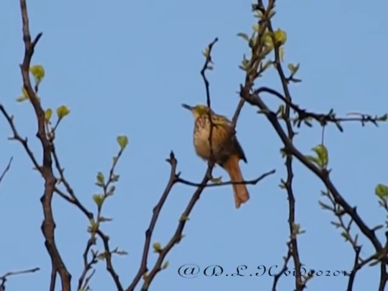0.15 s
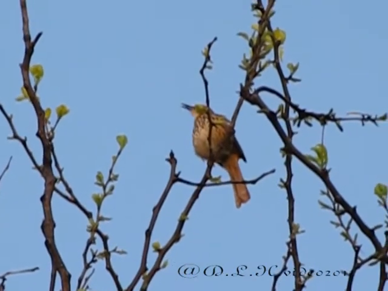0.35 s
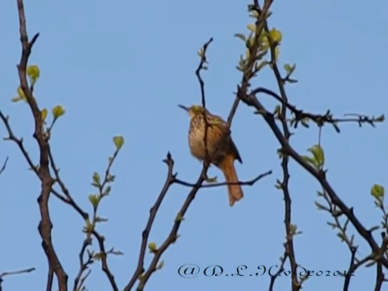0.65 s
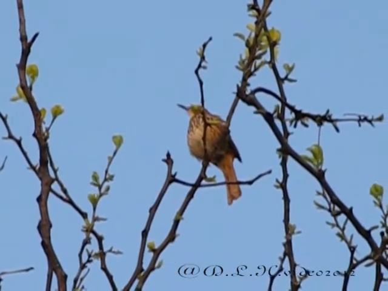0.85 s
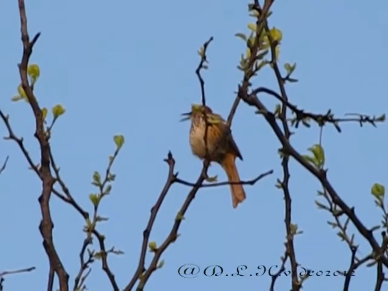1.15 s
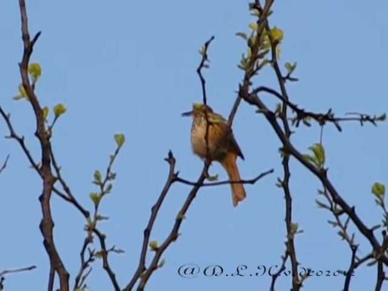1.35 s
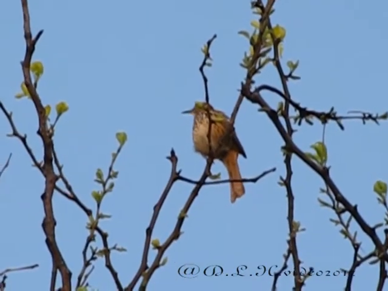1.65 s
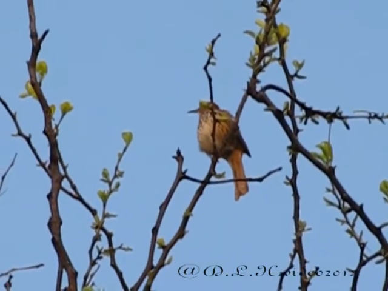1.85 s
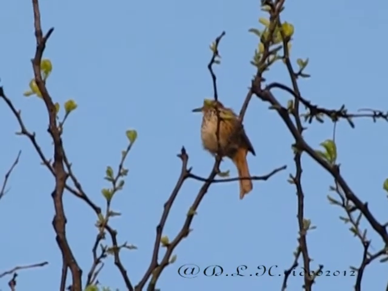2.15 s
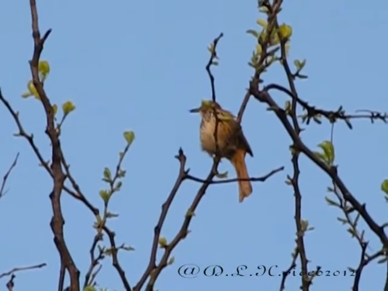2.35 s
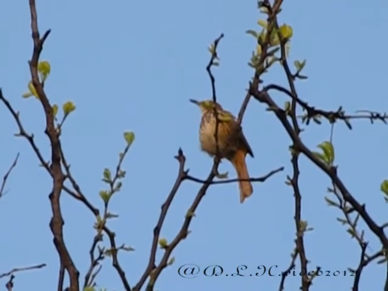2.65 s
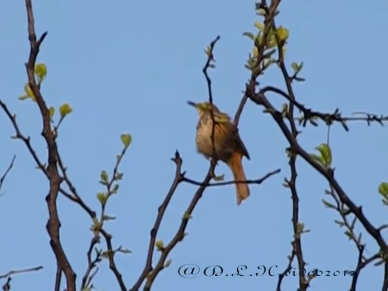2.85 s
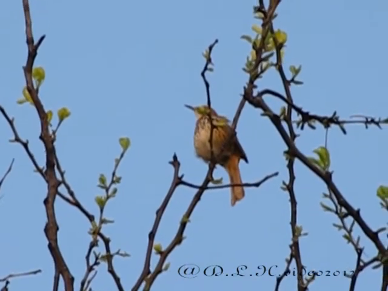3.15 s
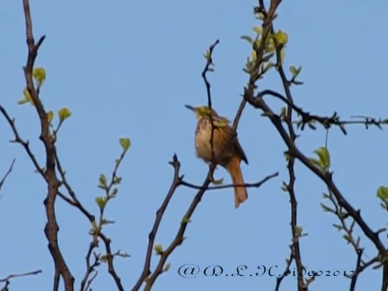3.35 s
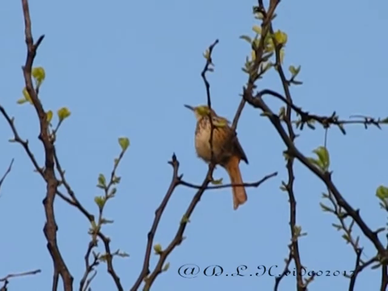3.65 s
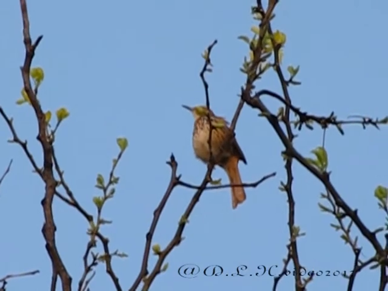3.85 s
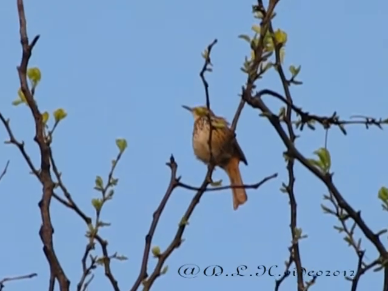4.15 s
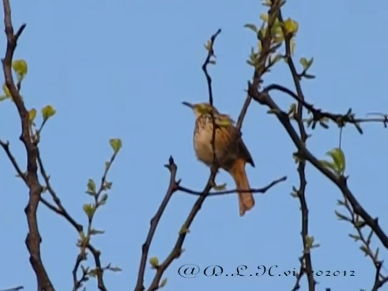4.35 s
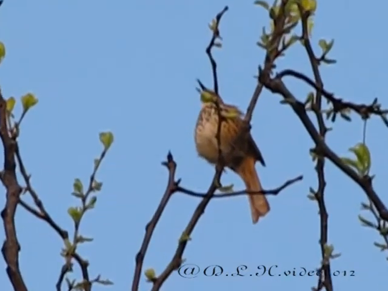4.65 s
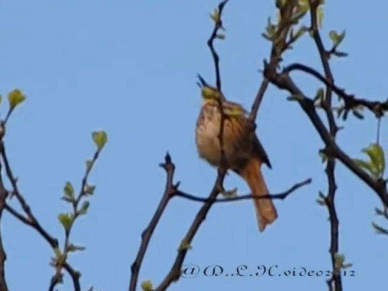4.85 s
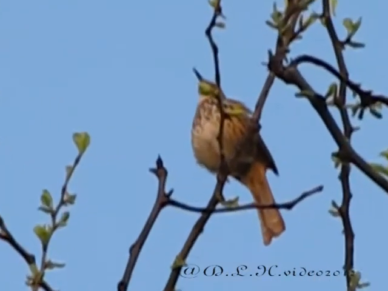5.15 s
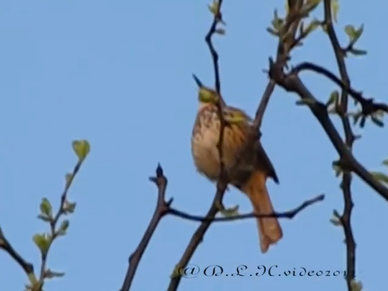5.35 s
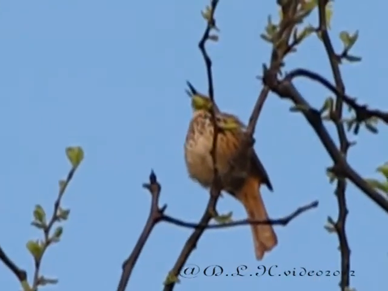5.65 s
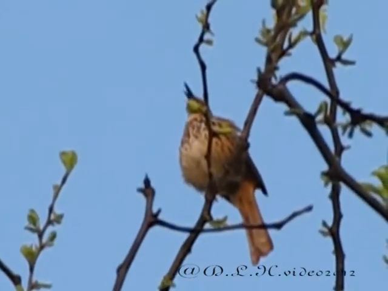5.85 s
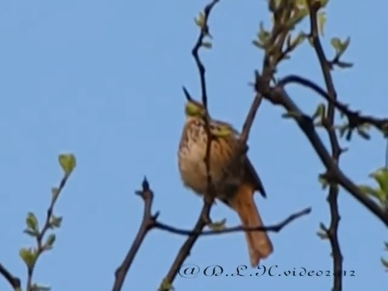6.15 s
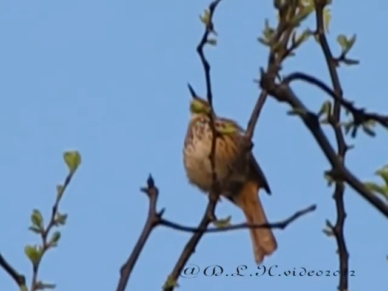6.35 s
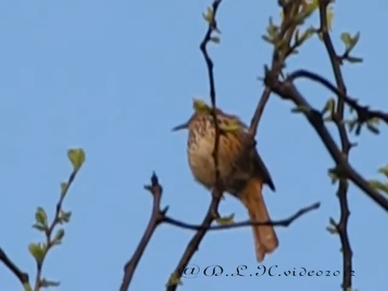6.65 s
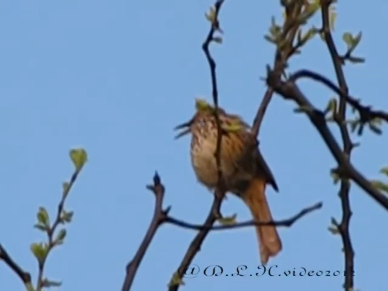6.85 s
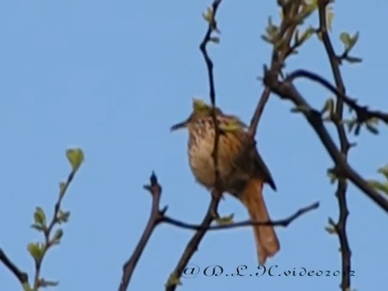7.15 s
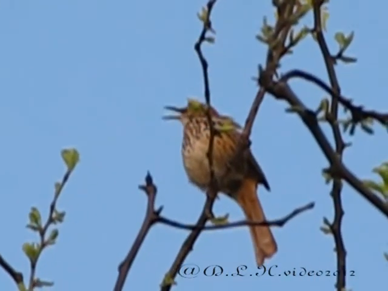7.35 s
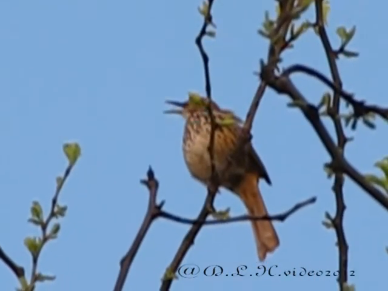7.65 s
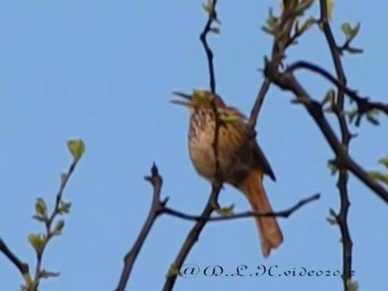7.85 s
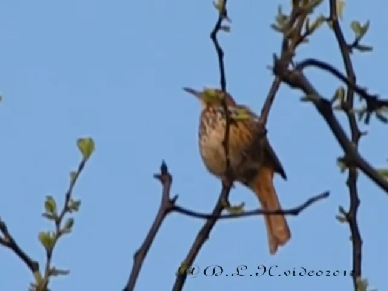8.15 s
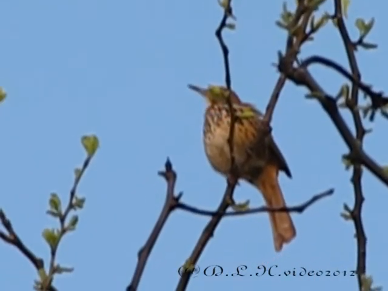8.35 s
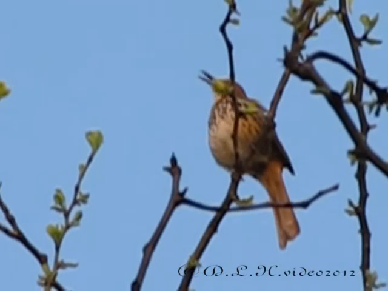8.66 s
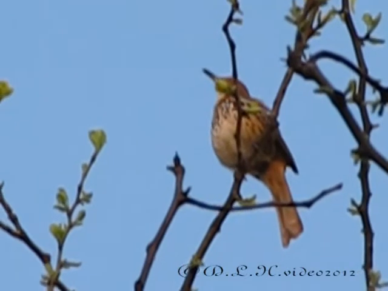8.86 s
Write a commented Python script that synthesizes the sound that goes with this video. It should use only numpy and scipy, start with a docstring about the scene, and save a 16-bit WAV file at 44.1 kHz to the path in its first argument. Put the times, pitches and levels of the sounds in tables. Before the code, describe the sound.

Quick, changing phrases of birdsong ring from a treetop over faraway chirps and soft traffic rumble, with one sharp pop close by.

```python
"""Outdoors among trees, a brown thrasher sings from a treetop: trills, two-voiced slurs, nasal buzzes
and thin whistles. The two sides of its voice box (the syrinx) vibrate alone or together, and the
ground and trees echo the song. Farther birds chirp and whistle, distant traffic rumbles, and there
are a few dull knocks, some small ticks and one sharp pop close by."""
import sys
import numpy as np
from scipy import signal
from scipy.fft import rfft, irfft, next_fast_len
from scipy.io import wavfile
from scipy.ndimage import uniform_filter1d, map_coordinates

SR = 44100
rng = np.random.default_rng(int(sys.argv[2]) if len(sys.argv) > 2 else 0)


def wav_record(signal):
    """Record a signal, one row per channel, as 16-bit PCM in the file named by sys.argv[1]."""
    frames = np.transpose(np.atleast_2d(signal))
    bounded = np.clip(frames, -1, 1)
    # unit amplitude maps onto the largest positive 16-bit level
    quanta = np.round(bounded * 32767).astype(np.int16)
    wavfile.write(sys.argv[1], SR, quanta)


N = 396459

# tone colour of hissing air: f/Hz, level/dB
HISS_COLOUR = [(2500, -14), (4100, 3), (5400, -9), (8600, -4), (16000, -37.5)]


def voice(hz, db, jitter, fade=.011):
    """One vibrating side of the voice box: a slightly unsteady complex tone with soft ends."""
    phase = np.cumsum(hz * (1 + jitter * wobble(696.6, len(hz)))) / SR
    edges = signal.windows.tukey(len(hz), min(fade * SR / len(hz), 1))
    return amp(db) * edges * np.exp(2j * np.pi * phase)


def throat(tone, bright_db, fall_db, shut_db=0, open_bill_hz=3430):
    """Airflow distorts the voices, adding overtones; shut_db mutes them as low notes close the bill."""
    # overtones from the second harmonic up: level/dB
    overtone_levels = [-25, -31.5, -35, -20, -30]
    # how the throat colours them: f/Hz, gain/dB
    colour = [(4000, 3.5), (5800, -1.5), (7800, 3), (9600, -9.5), (11500, 3.5), (14500, -23)]
    size = np.sqrt(np.abs(uniform_filter1d(np.abs(tone) ** 2, size=130))) + 1e-6
    swing = tone / np.maximum(size, np.abs(tone))
    phase_step = np.angle(uniform_filter1d(tone * np.roll(tone, 1).conj(), size=260))
    pitch = phase_step * SR / (2 * np.pi)
    closed = np.clip(2 * (1 - pitch / open_bill_hz), 0, 1)
    overtones = sum(amp(db + fall_db * (k - 2) + 3.5 * wobble(220, N)) * (swing ** k).real
                    for k, db in enumerate(overtone_levels, 2))
    overtones = overtones * size * amp(shut_db * closed)
    return tone.real + amp(bright_db) * filtered(overtones, lambda hz: amp(along(colour, hz)))


def rasp(tone, db, width_hz):
    """Swirling air shakes a voice and spreads noise around its pitch."""
    return tone * (1 + amp(db) * (wobble(2 * width_hz, N) + 1j * wobble(2 * width_hz, N)))


def slurs():
    """Loud gliding notes: two voices meet, then one falls and loses its overtones."""
    # paths of the low and the high voice: t/s into the slur, f/Hz, level/dB
    low = [(0, 3032, -28), (.025, 3047, -13.5), (.052, 3684, -5.5), (.078, 2724, -6.5), (.11, 2350, -13.5),
           (.135, 2270, -20)]
    high = [(.003, 3566, -18.5), (.038, 4000, -7.5), (.046, 4060, -33)]
    # each slur: t/s, pitch ratio, gain/dB, extra gain of the high voice/dB
    notes = [(4.422, 0.99, -9.5, -3), (4.837, 1, -7.5, 2.5), (5.665, 0.98, -8, 1)]
    tone = np.zeros(N, complex)
    for s, ratio, level_db, high_db in notes:
        for side, side_db in (low, 0), (high, high_db):
            hz, db = gesture(side)
            add(tone, s + side[0][0], voice(hz * ratio, db + level_db + side_db, jitter=.013))
    return throat(rasp(tone, db=-27, width_hz=1300), bright_db=-1, fall_db=-5.5, shut_db=-9)


def clear_notes():
    """Bright, clean trills and thin whistles that plunge."""
    # path of a plunge: t/s into the note, f/Hz, level/dB
    plunge = [(0, 5400, -38), (.035, 5900, -18.5), (.055, 5150, -21), (.062, 3900, -9.5), (.079, 2100, -17)]
    # when each note is sung: t/s, gain/dB
    plunges = [(4.63, -8), (5.881, -8.5)]
    trills = [(.012, 0.049, 0), (.245, .06, 0.73)]  # t/s, length of the swings/s, gain/dB
    tone = np.zeros(N, complex)
    hz, db = gesture(plunge)
    for s, level_db in plunges:
        add(tone, s, voice(hz, db + level_db, jitter=.0011))
    for s, *note in trills:
        add(tone, s, voice(*trill(*note), jitter=.008))
    return throat(tone, bright_db=2, fall_db=-6)


def trill(length, db, swings=4, hurry=.17):
    """Pitch and level of quickening swings and the slide after them."""
    # the closing slide: t/s into it, f/Hz, level/dB
    slide = [(0, 5970, -23.5), (.022, 4480, -16), (.045, 4020, -19), (.079, 3280, -25)]
    u = np.linspace(0, 1, int(length * SR))
    up = 1 - np.abs(np.sin(np.pi * swings * (u + hurry * u * (u - 1))))
    swing_hz = up * arc((4390, 6400, 6020), u) + (1 - up) * arc((2360, 2955, 5220), u)
    swing_db = arc((-28.5, -21.5, -21), u)
    slide_hz, slide_db = gesture(slide)
    return smooth(np.r_[swing_hz, slide_hz], 80), db + smooth(np.r_[swing_db, slide_db], 200)


def whistles():
    """Clear whistles on one side of the voice box overlap the scoops on the other."""
    # t/s, length/s, start f/Hz, middle f/Hz, end f/Hz, level/dB, loudest point (0 to 1)
    notes = [ (6.787, 0.067, 4030, 3944, 4400, -19, 0.41), (6.85, .05, 6250, 5850, 5200, -31, .6),
             (6.893, .132, 5270, 4870, 4680, -29.5, .45), (7.234, 0.056, 4340, 3950, 3740, -18, 0.41),
             (7.293, 0.085, 4970, 4490, 4800, -17, 0.47), (7.365, .06, 5650, 5500, 5330, -35, .45),
             (7.623, 0.052, 4410, 4036, 4086, -18.5, 0.81), (7.693, .086, 4580, 4750, 4580, -15.5, .52),
             (8.63, .057, 3235, 2920, 2430, -16, 0.81), (8.679, 0.054, 2345, 1890, 2800, -28, 0.14), ]
    tone = scoops()
    for s, *note in notes:
        add(tone, s, voice(*bend(*note), jitter=.007))
    return throat(rasp(tone, db=-27, width_hz=700), bright_db=-3, fall_db=-3)


def bend(length, start_hz, middle_hz, end_hz, db, crest, swell_db=12):
    """Pitch and level of a note that bends once, swells and fades."""
    u = np.linspace(0, 1, int(length * SR))
    from_crest = np.where(u < crest, 1 - u / crest, (u - crest) / (1 - crest))
    return arc([start_hz, middle_hz, end_hz], u), db - swell_db * from_crest ** 2


def scoops():
    """Scooping notes break into pulses as they climb; low rising notes quaver at their start."""
    # scoops: t/s, length/s, start f/Hz, dip f/Hz, time to the dip/s, level/dB
    dips = [(7.028, 0.13, 3120, 2654, 0.041, -21), (7.354, .136, 2880, 2653, 0.068, -22.5),
            (7.752, .152, 3070, 2542, .08, -27)]
    # rising notes: t/s, length/s, start f/Hz, middle f/Hz, end f/Hz, level/dB, loudest point (0 to 1)
    risers = [(8.481, 0.12, 1764, 1854, 2090, -22, 0.72), (8.939, 0.089, 1820, 1890, 2210, -23, 0.33)]
    tone = np.zeros(N, complex)
    for s, *note in dips:
        add(tone, s, quaver(*scoop(*note), rate_hz=64, depth=.05, swell_db=7, deepest=.58, spread=.25))
    for s, *note in risers:
        add(tone, s, quaver(*bend(*note), rate_hz=115, depth=.08, swell_db=2, deepest=.15, spread=.5))
    return tone


def scoop(length, start_hz, dip_hz, dip_s, db, top_hz=3267, hold_s=.025):
    """Pitch and level of a note that dips, then hooks up to a held top."""
    t = np.arange(int(length * SR)) / SR
    sink = np.clip(1 - t / dip_s, 0, 1) ** 2
    climb = np.clip((t - dip_s) / (length - hold_s - dip_s), 0, 1) ** 2.47
    hz = dip_hz + (start_hz - dip_hz) * sink + (top_hz - dip_hz) * climb
    catch_db = 24 * np.exp(-((length - .032 - t) / .006) ** 2)  # the voice catches just before the top
    return hz, db + arc((-3, 4.5, -1), t / length) - catch_db


def quaver(hz, db, rate_hz, depth, swell_db, deepest, spread):
    """A voice whose pitch and loudness tremble, most at the point `deepest` (0 to 1)."""
    shake = np.sin(2 * np.pi * np.cumsum(rate_hz * (1 + .3 * wobble(70, len(hz)))) / SR)
    strength = np.exp(-((np.linspace(0, 1, len(hz)) - deepest) / spread) ** 2)
    return voice(hz * (1 + depth * strength * shake), db + swell_db * strength * (shake - .5), .012)


def warble():
    """A reedy upsweep and quick flicks; every second vibration differs, adding rough in-between tones."""
    # upsweep: t/s, length/s, start f/Hz, middle f/Hz, end f/Hz, level/dB, loudest point (0 to 1)
    upsweep = (1.074, .062, 2450, 3250, 4050, -19.5, .62)
    # flicks: peak t/s, lead/s, tail/s, held f/Hz, peak f/Hz, level/dB, rough tone gain/dB
    flicks = [ (1.161, 0.043, 0.024, 2420, 3540, -17.5, 2), (1.216, 0.031, 0.024, 2346, 3590, -16.5, 0),
              (1.276, 0.037, 0.036, 2480, 3490, -17, -2), (8.717, 0.011, 0.023, 1780, 3000, -18, -20),
              (8.768, .025, 0.032, 1603, 2450, -23.5, -9), ]
    tone, rough = np.zeros((2, N), complex)
    add(tone, upsweep[0], voice(*bend(*upsweep[1:]), jitter=.017))
    for s, lead, *note, rough_gain in flicks:
        hz, db = flick(lead, *note, width_s=.0055)
        add(tone, s - lead, voice(hz, db, jitter=.018))
        rough_db = db.min() + rough_gain - 30 * (hz / np.median(hz) - 1)  # weakest at the peak
        add(rough, s - lead, voice(1.5 * hz, rough_db, jitter=.03))
    return throat(rasp(tone, db=-20, width_hz=900) + rough, bright_db=-4, fall_db=-3)


def flick(lead, tail, held_hz, peak_hz, db, width_s, sag_hz_per_s=4390, drop_db=14):
    """Pitch and level of a note that darts up to a sharp peak, loudest there."""
    t = np.arange(-lead, tail, 1 / SR)
    hz = held_hz + (peak_hz - held_hz) * np.exp(-np.abs(t) / width_s) - sag_hz_per_s * np.abs(t)
    return smooth(hz), db - drop_db * np.maximum(-t / lead, t / tail)


def nasal_notes(upper_db=-12, second_db=-22, lower_db=-16, hiss_db=-25):
    """Low rough notes: a fast flutter adds two tones above and one below, and air hisses through."""
    # a second voice falling over the loudest buzz:
    # t/s, length/s, start f/Hz, middle f/Hz, end f/Hz, level/dB, loudest point (0 to 1)
    upper_voice = (2.915, .085, 2700, 2520, 2250, -28, .55)
    tone = np.zeros(N, complex)
    for s, hz, db, flutter_hz, depth_db in nasal_gestures():
        flutter = voice(flutter_hz, 2 * wobble(120, len(hz)), jitter=.16)
        bands = amp(upper_db) * flutter + amp(second_db) * flutter ** 2 + amp(lower_db) * flutter.conj()
        carrier = voice(hz, db + 2.5 * wobble(250, len(hz)), jitter=.03, fade=.014)
        add(tone, s, carrier * (1 + amp(depth_db) * bands))
    add(tone, upper_voice[0], voice(*bend(*upper_voice[1:]), jitter=.022))
    airflow = uniform_filter1d(np.abs(tone), size=600)
    return throat(tone, bright_db=-22.5, fall_db=3) + amp(hiss_db) * airflow * noise(HISS_COLOUR, N)


def nasal_gestures():
    """Start/s, pitch/Hz, level/dB, flutter rate/Hz and flutter depth/dB of each yelp, bark and buzz."""
    # peak t/s, lead/s, tail/s, held f/Hz, peak f/Hz, level/dB
    yelps = [(.946, .021, 0.08, 1728, 2357, -25), (1.393, .02, 0.069, 1766, 2334, -24.5)]
    # t/s, length/s, start f/Hz, settled f/Hz, start level/dB, settled level/dB
    barks = [ (2.187, 0.11, 2165, 1568, -19.5, -35.5), (2.663, 0.055, 2075, 1630, -14, -31),
             (2.812, 0.073, 2186, 1800, -18.5, -26.5), (3.318, 0.16, 2070, 1770, -14.5, -31.5), ]
    # t/s, length/s, start f/Hz, middle f/Hz, end f/Hz, level/dB, loudest point (0 to 1)
    buzzes = [(2.257, .24, 1800, 2084, 1790, -25.5, 0.18), (2.876, 0.15, 1738, 1902, 1790, -21, 0.45),
              (3.388, .22, 1740, 2088, 1833, -25.5, 0.4)]
    for s, lead, *note in yelps:
        hz, db = flick(lead, *note, width_s=.0067)
        yield s - lead, hz, db, .36 * hz, 6.5
    for s, *note in barks:
        hz, db = bark(*note)
        yield s, hz, db, np.full(len(hz), 393), 2
    for s, *note in buzzes:
        hz, db = bend(*note)
        yield s, hz, db, arc((379.5, 686, 405), np.linspace(0, 1, len(hz))), -4


def bark(length, start_hz, settled_hz, start_db, settled_db, settle_s=.0144):
    """Pitch and level relax together after a hard start."""
    effort = np.exp(-np.arange(int(length * SR)) / SR / settle_s)
    return settled_hz + (start_hz - settled_hz) * effort, settled_db + (start_db - settled_db) * effort


def hisses():
    """Soft hisses that swell and fade."""
    # t/s, length/s, level/dB
    swells = [(0.79, 0.35, -48), (3.049, 0.16, -45), (4.128, 0.37, -50.5)]
    level = np.zeros(N)
    for s, length, db in swells:
        add(level, s, amp(db) * signal.windows.hann(int(length * SR)))
    return level * noise(HISS_COLOUR, N)


def knocks_and_ticks():
    """Dull knocks, most bunched into a "chak", and thin dry ticks."""
    # when they sound: t/s, level/dB
    knocks = [(.43, -29), (.787, -26), (.794, -19), (.801, -22), (.812, -21)]
    ticks = [(.423, -31.5), (2.886, -36), (6.337, -43)]
    # their tone colours: f/Hz, level/dB
    knock_colour = [(300, -14), (600, 3), (1100, 7), (3700, -7), (5000, -20), (15000, -44)]
    tick_colour = [(1500, -12), (4000, 3.5), (10000, -17), (15000, -38)]
    return cracks(knocks, knock_colour, t60=.044) + cracks(ticks, tick_colour, t60=.058)


def cracks(events, spectrum, t60):
    """Sudden bursts of noise that fade by 60 dB in t60 seconds."""
    level, t = np.zeros(N), np.arange(SR // 10) / SR
    for s, db in events:
        add(level, s, amp(db - 60 * t / t60) * (1 - np.exp(-t / .0005)))
    return level * noise(spectrum, N)


def pop(start_s=3.2862, level_db=4):
    """One sharp knock close by on the right; its ringing dies at once."""
    # ringing tones: f/Hz, level/dB, time to fade by 60 dB/s
    tones = [(656, -5.5, 0.0028), (1400, -3.5, 0.0027), (3020, -14, 0.0089), (7400, -22, 0.0049)]
    out, t = np.zeros(N), np.arange(SR // 20) / SR
    ring = sum(amp(db - 60 * t / t60) * np.sin(2 * np.pi * hz * t) for hz, db, t60 in tones)
    add(out, start_s, amp(level_db) * ring * (1 - np.exp(-t / .00011)))
    return out * amp([[-17], [0]])


def far_chirps(zigzag_hz=47, depth=.197, fall=.39, pulse_db=5):
    """A farther bird's harsh chirps: the pitch zigzags as it sinks, loudest in mid-swing."""
    # t/s, length/s, centre f/Hz at the start, level/dB
    chirps = [(0.637, 0.1, 4440, -41.5), (1.975, .04, 3450, -42.5), (2.112, 0.076, 4400, -38),
              (3.674, 0.091, 4666, -39.5), (5.228, 0.059, 5100, -49.5), (5.633, .08, 4610, -41),
              (6.721, .04, 3410, -42), (8.862, 0.094, 4590, -36)]
    out = np.zeros(N)
    for s, length, start_hz, db in chirps:
        t = np.arange(int(length * SR)) / SR
        swing = signal.sawtooth(2 * np.pi * zigzag_hz * t, .7)
        hz = start_hz * (1 - fall * t / length) * (1 - depth * swing)
        add(out, s, voice(hz, db + pulse_db * np.cos(np.pi * swing), jitter=.025, fade=.035).real)
    return out


def far_buzzes():
    """The farther bird's thin buzzes: high notes so unsteady that they blur into noise."""
    # t/s, length/s, start f/Hz, end f/Hz, level/dB
    buzzes = [(2.248, .37, 4130, 3875, -48.5), (4.147, .27, 4020, 4040, -47), (7.08, 0.26, 8450, 7430, -58)]
    out = np.zeros(N)
    for s, length, start_hz, end_hz, db in buzzes:
        hz = np.linspace(start_hz, end_hz, int(length * SR))
        add(out, s, voice(hz, db, jitter=.0814, fade=length / 2).real)
    return out


def far_whistler(period_s=.109, sink_per_s=.25, fade_db_per_s=14):
    """A third bird repeats a little whistle, never quite alike, in runs that sink and fade."""
    # a quick arch and a short held tone: t/s into the whistle, f/Hz, level/dB
    figure = [(0, 1850, -42), (.02, 2850, -45), (.04, 2150, -43), (.05, 2500, -60), (.06, 2950, -44),
              (.09, 2850, -42)]
    # start t/s, end t/s, gain/dB
    runs = [(6.33, 6.7, -6), (7.992, 8.35, -1)]
    out = np.zeros(N)
    hz, db = gesture(figure)
    for start, end, level_db in runs:
        for t in np.arange(0, end - start, period_s):
            sharp, loud = rng.standard_normal(2)
            pitch = hz * (1 + .015 * sharp - sink_per_s * t)
            add(out, start + t, voice(pitch, db + level_db + loud - fade_db_per_s * t, jitter=.01).real)
    return out


def treetop(song):
    """The song reaches both ears directly, off the ground and a bough, and through the trees."""
    # balance between the ears: f/Hz, left minus right/dB
    balance = [(2000, -3.5), (3200, -3), (4500, 6.5), (9000, 5.5)]
    # echoes off the ground and a bough: delay/s, gain/dB
    bounces = [(.0068, -12), (.0135, -17)]
    direct = filtered(song, lambda hz: amp(np.outer([.5, -.5], along(balance, hz))))
    echoes = filtered(song, lambda hz: sum(amp(db) * np.exp(-2j * np.pi * hz * s) for s, db in bounces))
    return direct + echoes * np.array([[.5], [1]]) + outdoors(song, near_db=-10, trees_db=-11)


def outdoors(x, near_db, trees_db):
    """Ground and branches send back a few quick copies; the trees add a long thin tail."""
    # the tail: f/Hz, time to fade by 60 dB/s
    fade_times = [(3500, 0.62), (6000, 0.41), (12000, 0.023)]
    hz, t, spectra = signal.stft(rng.standard_normal((2, SR)), SR, nperseg=256)
    tail = signal.istft(spectra * amp(-60 * t / along(fade_times, hz)[:, None]), SR, nperseg=256)[1]
    answer = amp(trees_db) * tail / np.linalg.norm(tail[0])
    for ear in answer:
        delays = (rng.uniform(.002, .016, size=14) * SR).astype(int)
        ear[delays] += amp(near_db) * rng.standard_normal(len(delays)) / np.sqrt(len(delays))
    return signal.fftconvolve(x[None], answer, axes=1)[:, :N]


def traffic(road_db=-31, firing_hz=71.04):
    """Distant road noise, nearly the same in both ears in the bass, and a droning engine."""
    # tone colour of the road: f/Hz, level/dB
    colour = [(20, -20.5), (50, -5), (68, -13), (100, -5.5), (170, -13.5), (400, -17), (900, -17),
              (1800, -31.5), (3100, -35.5), (6300, -48.5), (15000, -62.5)]
    # f/Hz, likeness of left and right (0 to 1)
    likeness = [(250, 0.93), (1200, 0.66), (8000, 0.033)]
    # engine drone: t/s, level/dB, third harmonic level/dB
    engine = [(0, -37, -62), (2.9, -38, -40), (5, -37, -51), (9, -34.5, -56)]
    spread = lambda hz: np.arccos(along(likeness, hz)) / 2
    rumble = np.array([noise(colour, N), noise(colour, N)])
    mid, side = filtered(rumble, lambda hz: np.array([np.cos(spread(hz)), np.sin(spread(hz))]))
    road = amp(road_db) * np.array([mid + side, mid - side])
    s, *columns = np.transpose(engine)
    db, third_db = [np.interp(np.arange(N) / SR, s, c) for c in columns]
    phase = 2 * np.pi * np.cumsum(firing_hz + 1.787 * wobble(12, N)) / SR
    drone = amp(db) * np.sin(phase) + amp(third_db) * np.sin(3 * phase)
    return road + np.sqrt(2) * amp(2 * wobble(12, N)) * drone


def gesture(rows):
    """Pitch and level for every sample of a path; muscles round off the corners."""
    s, *columns = np.transpose(rows)
    t = np.arange(s.min(), s.max(), 1 / SR)
    return [smooth(np.interp(t, s, c)) for c in columns]


def smooth(x, samples=110):
    """A running average."""
    return uniform_filter1d(x, size=samples, mode="nearest")


def arc(points, u):
    """The parabola through a start, a middle and an end value, for u from 0 to 1."""
    return np.polyval(np.polyfit([0, .5, 1], points, 2), u)


def amp(db):
    """Decibels as a gain."""
    return 10 ** (np.asarray(db) / 20)


def along(points, hz):
    """Read between (f/Hz, value) points on a log frequency axis."""
    f, v = np.transpose(points)
    return np.interp(np.log(hz + 1), np.log(f + 1), v)


def filtered(x, response):
    """Scale each frequency in x by response(hz)."""
    n = x.shape[-1]
    m = next_fast_len(n + 8192)
    return irfft(rfft(x, m) * response(np.fft.rfftfreq(m, 1 / SR)), m)[..., :n]


def noise(spectrum, size):
    """Coloured noise of rms 1."""
    x = filtered(rng.standard_normal(size), lambda hz: amp(along(spectrum, hz)))
    return x / np.sqrt(np.mean(x ** 2) + 1e-20)


def wobble(rate, size):
    """A smooth curve through `rate` random values a second."""
    return map_coordinates(rng.standard_normal(int(size * rate / SR) + 4), [np.arange(size) * rate / SR])


def add(track, s, x):
    """Mix x into the track from time s."""
    part = track[max(round(s * SR), 0):][:len(x)]
    part += x[:len(part)]


def scene():
    """The thrasher, two farther birds, the pop and the traffic, in stereo."""
    song = clear_notes() + warble() + whistles() + slurs() + nasal_notes() + hisses() + knocks_and_ticks()
    far, whistler = far_chirps() + far_buzzes(), far_whistler()
    near_bird = treetop(song)
    far_bird = amp(-1.5) * far + outdoors(far, near_db=0, trees_db=5)
    third_bird = whistler + outdoors(whistler, near_db=-6, trees_db=-4)
    return near_bird + far_bird + third_bird + pop() + traffic()


def record(dry):
    """Cut away the very highest treble."""
    return filtered(dry, lambda hz: hz < 15700)


dry = scene()
out = record(dry)
wav_record(out)
```